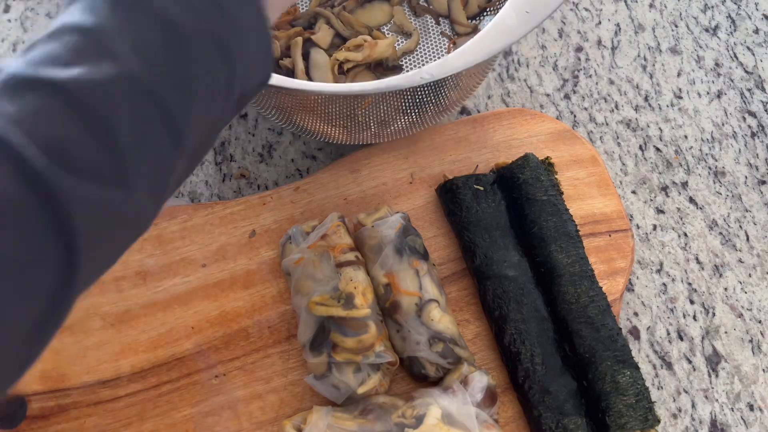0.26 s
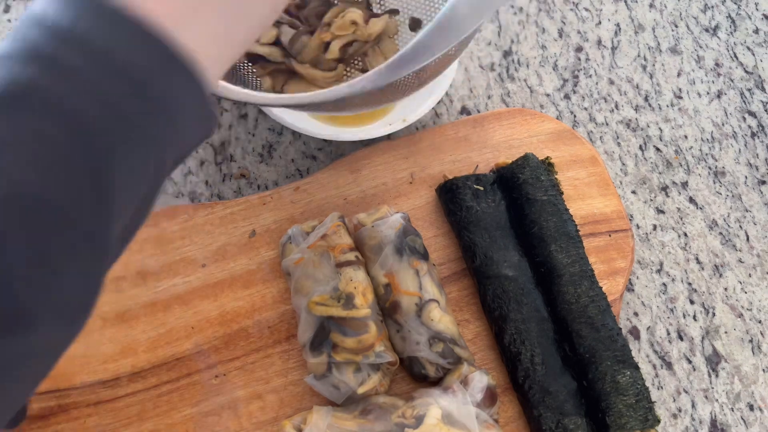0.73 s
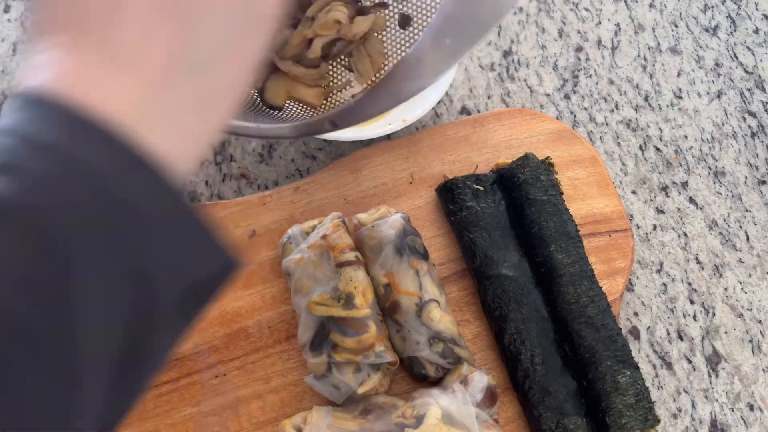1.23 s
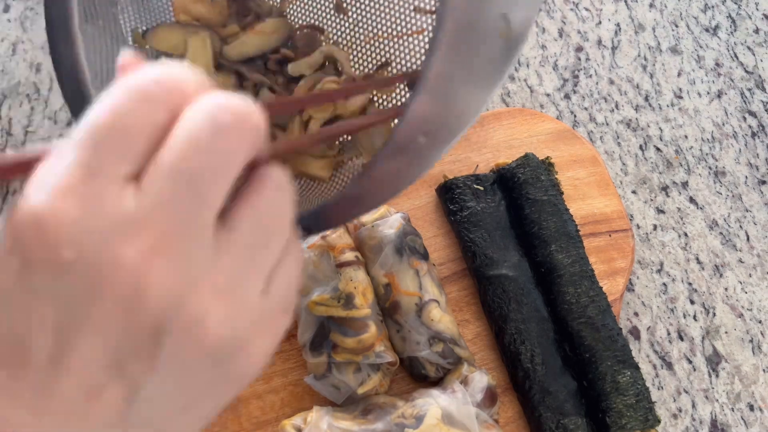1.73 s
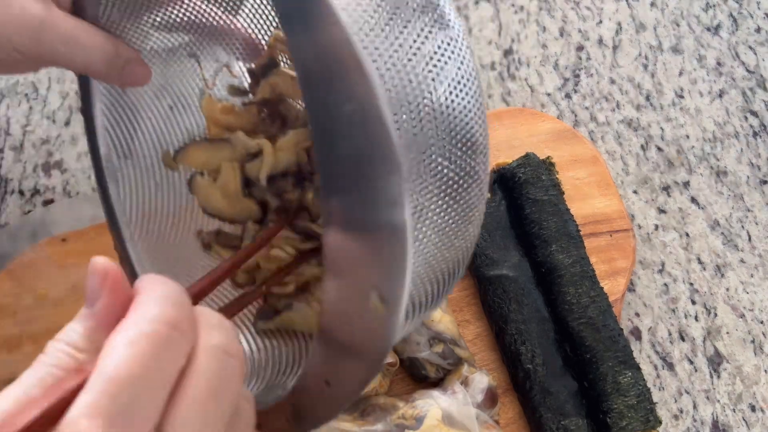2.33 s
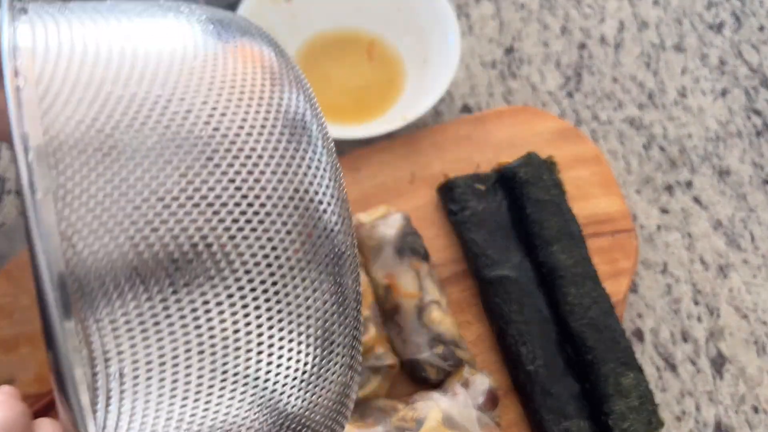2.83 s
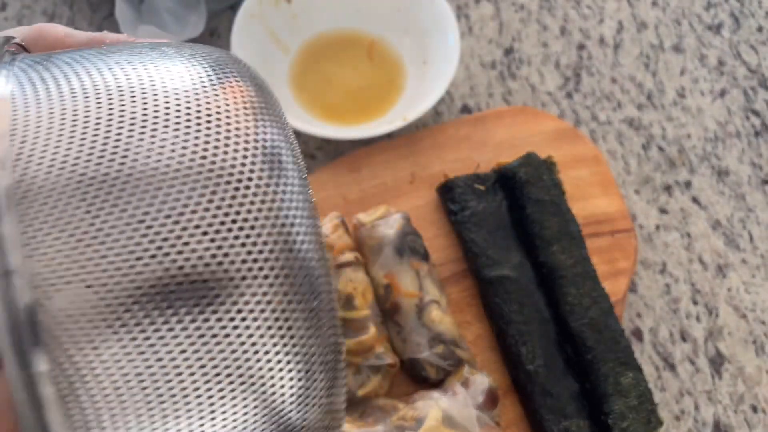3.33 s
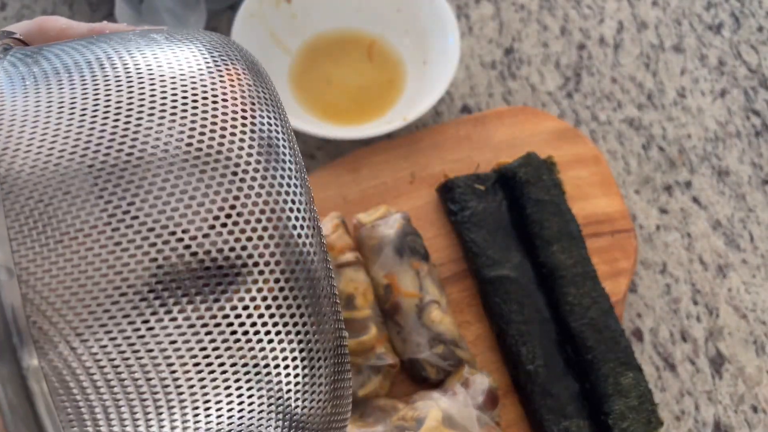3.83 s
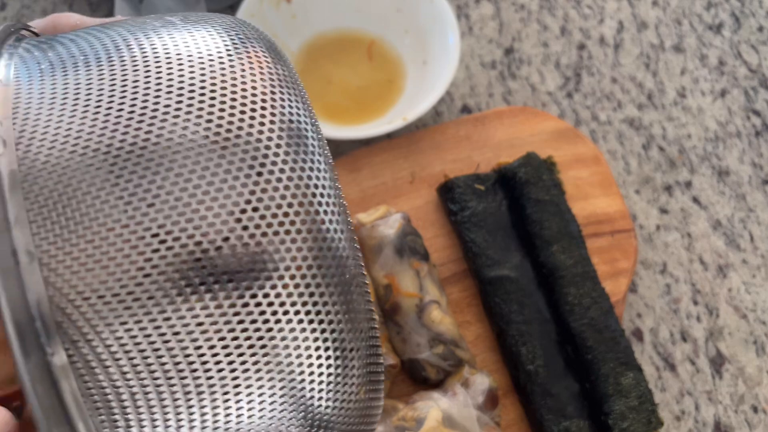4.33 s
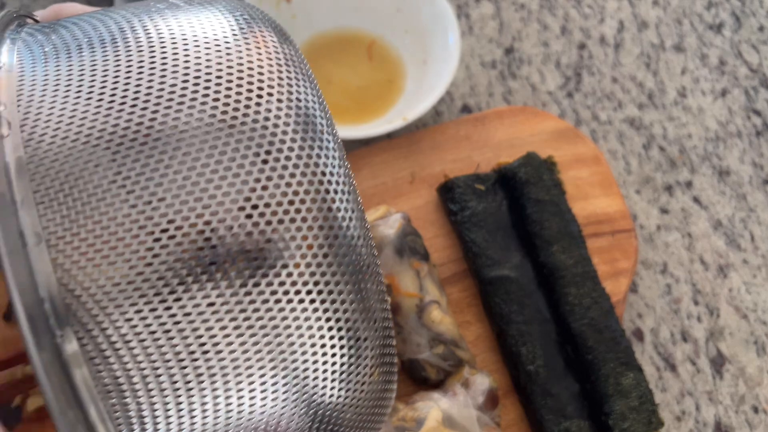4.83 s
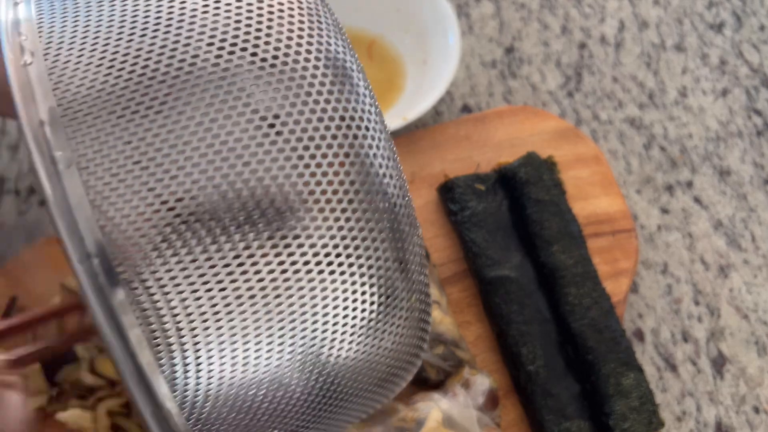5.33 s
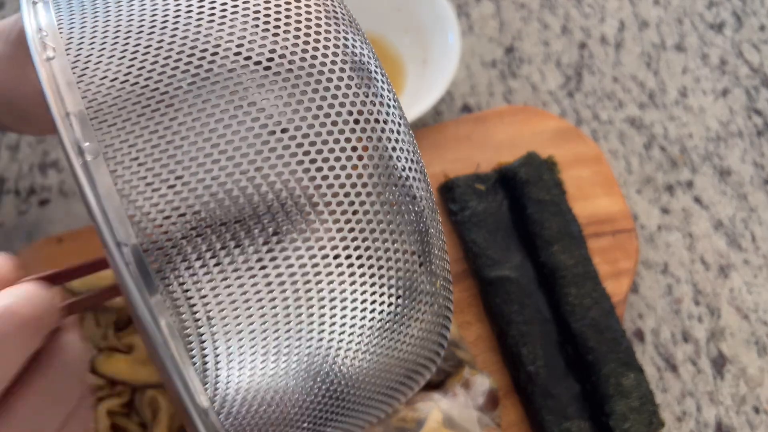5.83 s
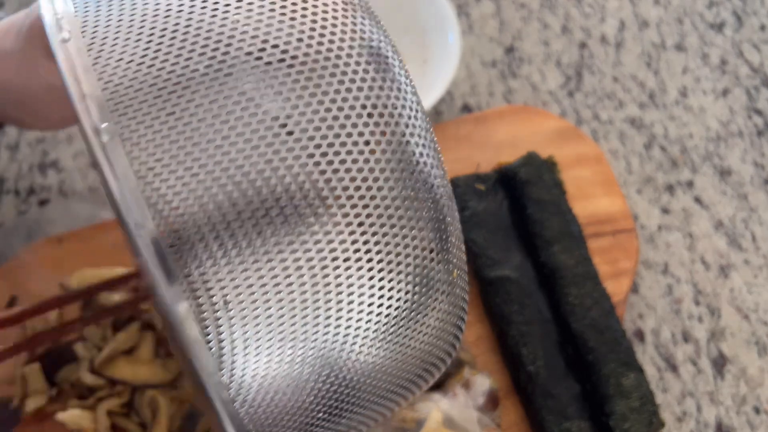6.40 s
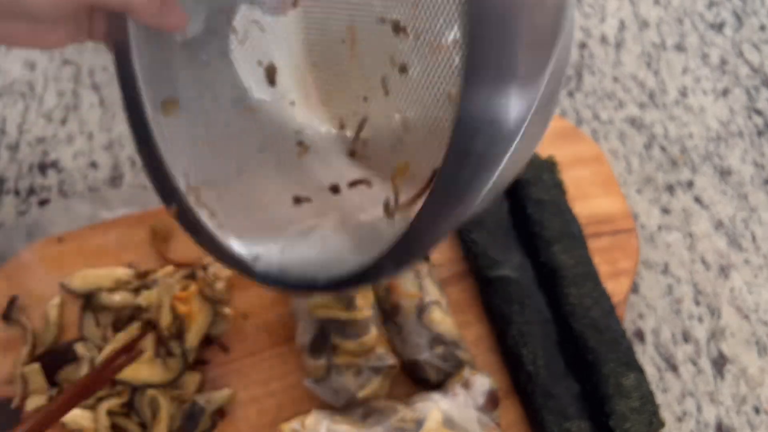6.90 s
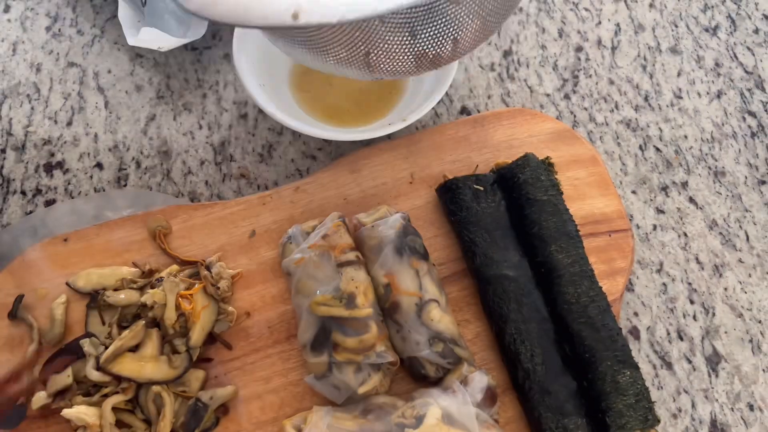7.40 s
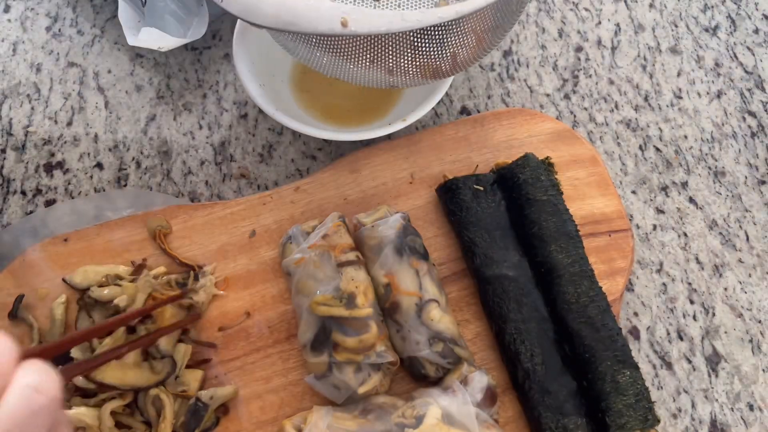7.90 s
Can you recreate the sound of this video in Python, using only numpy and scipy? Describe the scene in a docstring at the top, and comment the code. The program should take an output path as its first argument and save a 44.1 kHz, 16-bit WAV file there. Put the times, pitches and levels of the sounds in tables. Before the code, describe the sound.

Close in a small home kitchen, wooden chopsticks rake wet mushrooms from a holed steel colander. Quick bright clicks and tiny zipping scrapes come in bursts, strongest in the first two seconds, with soft thumps and brief squeaks. After a lull, sparser, lighter ticks ring on the tipped steel. Near the end the colander clatters onto a china bowl in rapidly fading bounces. A faint appliance hum sits underneath.

```python
"""Chopsticks raking mushrooms from a colander

Wooden chopsticks rake mushrooms from a holed steel colander, first level, then tipped over a cutting board.
Their tips skip from hole to hole and click: short random touches set the ringing notes of the steel going.
Wet food rustles in fine grains, squeaks are wavering tones, and soft thumps are low tones that die away.
At the end the colander rattles to rest on a china bowl, in a small kitchen with a humming appliance."""
import sys
import numpy as np
from scipy import signal
from scipy.fft import rfft, irfft, next_fast_len
from scipy.io import wavfile

SR = 44100
rng = np.random.default_rng(int(sys.argv[2]) if len(sys.argv) > 2 else 0)


def int16_out(signal):
    """Quantize to a 16-bit WAV file."""
    q = np.round(np.clip(np.atleast_2d(signal).T, -1, 1) * 32767)
    wavfile.write(sys.argv[1], SR, q.astype(np.int16))


N = 359415
TIME = np.arange(N) / SR


def from_db(db):
    """Turn decibels into a plain multiplier."""
    return 10 ** (np.asarray(db) / 20)


def rms_one(x):
    """Scale a sound to an average (rms) strength of 1."""
    return x / np.sqrt(np.mean(x ** 2) + 1e-20)


def at_hz(points, hz):
    """Read between the points of a table, with pitch on a logarithmic scale."""
    points = np.array(points)
    return np.interp(np.log(hz + 1), np.log(points[:, 0]), points[:, 1])


def add(track, s, sound):
    """Mix a sound into a track, starting at s seconds."""
    part = track[max(int(s * SR), 0):][:len(sound)]
    part += sound[:len(part)]


def wander(t, per_s):
    """A random value that glides to a new place so many times a second."""
    return np.interp(t * per_s, np.arange(SR), rng.standard_normal(SR))


def coloured(x, colour, size=4096):
    """Shape the spectrum with a filter that never sounds early (minimum phase), at unit power gain."""
    log_gain = np.log(from_db(at_hz(colour, np.fft.rfftfreq(size, 1 / SR))))
    cepstrum = irfft(log_gain)
    # folding the cepstrum onto its first half makes the filter start at once
    fold = 1 + np.sign(size / 2 - np.arange(size))
    fold[0] = 1
    pulse = irfft(np.exp(rfft(cepstrum * fold)))
    return signal.oaconvolve(x, pulse / np.linalg.norm(pulse))[:N]


def resonance(x, hz, width_hz):
    """One ringing pitch, with gain 1 at its peak; the narrower it is, the longer it rings."""
    r = np.exp(-np.pi * width_hz / SR)
    feed = np.array([1, 0, -1]) * (1 - r * r) / 2
    feedback = [1, -2 * r * np.cos(2 * np.pi * hz / SR), r * r]
    return signal.lfilter(feed, feedback, x + 1e-18)


def ringing(x, modes):
    """A contact plus the object's own notes (modes) that it sets ringing."""
    out = x
    for hz, db, t60 in modes:
        width_hz = np.log(1000) / (np.pi * t60)
        out = out + from_db(db) * resonance(x, hz, width_hz)
    return out


def brighten(x, treble_db, corner_hz=5000):
    """A harder contact has more treble: raise or lower what lies above the corner."""
    low = signal.sosfiltfilt(signal.butter(2, corner_hz, fs=SR, output="sos"), x)
    return low + from_db(treble_db) * (x - low)


def contact(snap_s, shiver_db, shiver_s, size=2048, count=40):
    """One touch of unit energy: pitches arrive at their own delays, with a shiver of dying noise."""
    bands = np.linspace(0, count - 1, size // 2 + 1)
    delay_s = np.interp(bands, np.arange(count), snap_s * rng.exponential(1, count))
    phase = -2 * np.pi * np.cumsum(delay_s) * SR / size
    snap = irfft(np.exp(1j * phase)) * np.sqrt(np.linspace(1, 0, size))
    shiver = rng.standard_normal(size) * np.exp(-TIME[:size] / shiver_s)
    touch = snap + from_db(shiver_db) * shiver / np.linalg.norm(shiver)
    return touch / np.linalg.norm(touch)


def glint(touch, glint_db=5, low_hz=1400, high_hz=9000, width_hz=330):
    """Every hole adds a brief ring at its own random pitch; unit energy."""
    hz = low_hz * (high_hz / low_hz) ** rng.random()
    touch = touch + from_db(glint_db) * resonance(touch, hz, width_hz)
    return touch / np.linalg.norm(touch)


def at_spot(touch, hz, db, width_hz):
    """The touched spot of the wall rings briefly at its own pitch."""
    return touch + from_db(db) * resonance(touch, hz, width_hz)


def clicks(rows, snap_s, shiver_db, shiver_s, graze_db=-21, graze_s=0.005, spot_width_hz=880):
    """Single touches, each after a faint graze; rows that name a spot on the steel ring there."""
    out = np.zeros(N)
    for s, db, treble_db, *spot in rows:
        touch = brighten(contact(snap_s, shiver_db, shiver_s), treble_db)
        if spot:
            touch = at_spot(touch, *spot, spot_width_hz)
        graze = contact(snap_s, shiver_db, shiver_s)
        add(out, s - graze_s, from_db(db + graze_db) * graze)
        add(out, s, from_db(db) * touch)
    return out


# colour of the room's air noise before its sides are shaped: (pitch [Hz], relative level [dB])
AIR = [(15, -36), (25, -23.5), (75, -6.5), (119, -10), (150, -3), (273, -11), (303, -17), (364, -13),
       (404, -24.5), (437, -16), (953, -28.5), (1300, -42.5), (1900, -39.5), (3000, -45), (12000, -47),
       (16200, -84), (22000, -120)]
AIR_DB = -61.5
# the appliance's hum: (pitch [Hz], width of the first of two filters [Hz], level [dB])
DRONE = [(147.74, 5.9, -65.5), (1457, 68, -85.5)]


def room_tone(bass_side_db=-19, treble_side_db=-6):
    """Soft air noise, nearly alike on both sides in the bass, and an appliance's wavering drone."""
    hz = np.fft.rfftfreq(N, 1 / SR)
    mid, side = rfft(rng.standard_normal((2, N))) * from_db(at_hz(AIR, hz))
    side = side * from_db(at_hz([(120, bass_side_db), (700, 3.4), (8000, treble_side_db)], hz))
    air = rms_one(irfft(mid + side * [[1], [-1]], N))
    drone = np.zeros(N)
    for f, width, db in DRONE:
        # noise through two narrow filters becomes a hum that wavers
        hum = resonance(resonance(rng.standard_normal(N), f, width), f, 2 * width)
        drone += from_db(db) * rms_one(hum)
    return from_db(AIR_DB) * air + drone


# wet mushrooms sliding and parting: (time [s], length [s], level at the top of the swell [dB])
SLIDES = [(-0.06, 0.15, -72), (0.261, 0.17, -72.5), (1.88, 0.14, -68.5), (2.195, 0.36, -76.5),
          (2.802, 0.24, -83), (3.721, 0.26, -70.5)]


def wet_food(grains_per_s=3000, grain_db=3, clumps_per_s=70, clump_db=3.0,
             low_hz=1700, high_hz=8500, width_hz=500, size=12):
    """Moist mushrooms slide over steel: fine grains of many pitches gather in uneven clumps."""
    swell = np.zeros(N)
    for s, length, db in SLIDES:
        swell += from_db(db) * np.sin(np.pi * np.clip((TIME - s) / length, 0, 1))
    happens = rng.random(N) < grains_per_s / SR
    strength = from_db(grain_db * np.minimum(rng.exponential(1, N), 4))
    grains = rng.standard_normal(N) * happens * strength
    dealt = rng.integers(0, size, N)  # which pitch each grain gets
    rustle = np.zeros(N)
    for k, hz in enumerate(np.linspace(low_hz, high_hz, size)):
        clumps = from_db(clump_db * wander(TIME, clumps_per_s))
        rustle += resonance(grains * clumps * (dealt == k), hz, width_hz) / np.sqrt(hz)
    return swell * rms_one(rustle)


# holes crossed per second in a usual stroke; a stroke louder by DOUBLING_DB is twice as fast
SKIPS_PER_S, USUAL_DB, DOUBLING_DB = 175, -40, 45
RELEASE_DB_PER_S = 1099  # the scrape dies as the tip lifts


def strokes(rows, snap_s, shiver_db, shiver_s, jitter, uneven_db, spot_width_hz, count=26, size=9000):
    """The tip catches in hole after hole, then lifts: uneven touches on a spot whose pitch glides."""
    out = np.zeros(N)
    for s, length, _, final_db, swell_db, treble_db, spot_hz, spot_db, glide in rows:
        per_s = SKIPS_PER_S * 2 ** ((final_db - USUAL_DB) / DOUBLING_DB)
        train = np.zeros(size)
        strength = np.sqrt(SR / per_s)  # slower touches are each stronger
        for k in range(count):
            touch = glint(contact(snap_s, shiver_db, shiver_s))
            slip, force = rng.uniform(-1, 1, 2)
            t = (k + jitter * slip * (k > 0)) / per_s
            drawn = min(t / length, 1)  # share of the stroke done
            lift_db = RELEASE_DB_PER_S * max(t - length, 0)
            db = final_db - swell_db * (1 - drawn) - lift_db
            touch = at_spot(touch, spot_hz * 2 ** (glide * drawn), spot_db, spot_width_hz)
            add(train, t, from_db(db + uneven_db * force) * strength * touch)
        add(out, s, brighten(train, treble_db))
    return out


TIPPED_S = 2.7  # the colander is level before this time [s] and tipped after it


def level_and_tipped(rows):
    """Split events into those before and those after the colander is tipped."""
    level = [row for row in rows if row[0] < TIPPED_S]
    tipped = [row for row in rows if row[0] >= TIPPED_S]
    return level, tipped


# a chopstick lands and is drawn over the holes, levels before the mix:
# (time [s], length [s], landing level [dB], final scrape level [dB], rise in level over the stroke [dB],
#  treble [dB], pitch of the spot [Hz], ring of the spot [dB], glide of the spot [octaves])
STROKES = [(0.421, 0.019, -51, -61.5, -2, -1.5, 1900, 11, -0.38),
           (0.455, 0.053, -35, -39.5, 10, 2, 7100, -13, 0.48),
           (0.511, 0.044, -47, -42.5, 0, -6.5, 4380, -1, 0),
           (0.8063, 0.0018, -32, -46, 3, 5, 2260, 2, 0.058),
           (0.814, 0.055, -36, -41, -4.5, -3, 2200, -8, -0.014),
           (0.855, 0.027, -41, -40, 4.5, 2, 920, 3, 0.36),
           (0.924, 0.011, -19.5, -37.5, 7, 2.5, 3120, 12, -0.33),
           (1.126, 0.023, -20, -51.5, -4, -11.5, 1700, -8, -0.12),
           (1.161, 0.064, -45, -35.5, 12, 1.5, 980, 2, -0.45),
           (1.463, 0.0044, -22.5, -44, 2.5, -2.5, 2870, 9, -0.41),
           (1.487, 0.029, -30.5, -29.5, 1.5, -1, 2710, 3.5, 0.024),
           (1.721, 0.01, -13.5, -35.5, 6, 2.5, 4100, -8, 0.18),
           (1.748, 0.018, -23, -28.5, 6, -2, 2470, -6, 0.27),
           (2.115, 0.0152, -33.5, -43.5, 10.5, -16.5, 2290, 2.5, 0.3),
           (3.277, 0.023, -37, -47.5, 0, 3, 1820, 13, 0.42),
           (3.741, 0.015, -44, -57.5, 3, 3, 1610, 10, 0.083),
           (4.305, 0.05, -31, -56, 7, 1, 2950, 6.5, 0.016),
           (4.664, 0.012, -23.5, -48.5, 5.5, 2.5, 1750, -4.5, -0.043),
           (4.718, 0.012, -29.5, -41, 0.5, 0.5, 3920, 7.5, -0.097),
           (4.758, 0.053, -33, -55, -11, -7, 2410, 2.5, 0.077),
           (5.088, 0.062, -47, -52.5, 5.5, 5, 4350, -12.5, -0.042),
           (5.158, 0.032, -38, -42, 3, -6, 3130, 8, -0.048),
           (5.529, 0.063, -24.5, -54, -3.5, 2.5, 4600, -9.5, 0.091),
           (5.575, 0.08, -46, -52.5, -2.5, -2, 2800, 4, -0.24),
           (5.888, 0.038, -25, -63.5, -2.5, 6.5, 2590, 10, 0),
           (5.923, 0.041, -49.5, -41, 10.5, 1, 2270, 12, 0.25),
           (5.966, 0.016, -25.5, -35.5, 9, 10.5, 3000, 10, -0.13),
           (6.247, 0.045, -30, -39, 17.5, -10, 2720, 5.5, 0.11),
           (6.52, 0.001, -22.5, -35.5, 0, -1, 2750, 14.5, -0.037)]
# the tip snaps free or clicks on the steel, levels before the mix:
# (time [s], level [dB], treble [dB], pitch of the spot [Hz], ring of the spot [dB])
TAPS = [(0.475, -37, -2, 6400, 4), (.484, -37, 19, 7700, -3), (0.4895, -20, 10.5, 8950, 7.5),
        (0.5096, -25, 13.5, 4400, -3), (0.543, -28.5, 10.5, 1700, -2), (.554, -22.5, -9, 2820, 1),
        (0.801, -35, -3, 2400, 3), (0.845, -26.5, 2, 2300, 10), (.878, -31, 6, 3420, 4),
        (0.8922, -18.5, 10, 6110, -1), (.904, -28, 1, 3050, 13), (.934, -23.5, 9, 3700, 11.5),
        (.945, -36, 12.5, 3300, 23), (1.178, -18.5, -5, 3480, 7.5), (1.196, -21, 6, 6240, 0),
        (1.212, -28.5, 12, 6200, 4), (1.229, -22.5, 9, 5870, 4.5), (1.477, -24, 4, 4330, 11),
        (1.494, -25, 13, 9000, 10), (1.503, -18, 12, 8600, -1), (1.5099, -10.5, 12.5, 7300, -13),
        (1.728, -18, -1, 3000, 7), (1.7541, -17.5, 10, 6940, -1), (1.769, -11, -5, 2860, 5.5),
        (3.296, -29.5, -4.5, 1500, 15), (4.158, -25, 1, 1640, -5), (4.178, -26.5, 5.5, 5630, 5.5),
        (4.2099, -25.5, 4, 4060, 0.5), (4.331, -34.5, -2.5, 2800, 13), (4.352, -42, -10, 1800, 7),
        (4.678, -28, -4.5, 1740, -6), (4.7116, -30.5, 16.5, 7600, -0.5), (4.722, -29, 10, 1870, 1),
        (5.064, -38.5, -2, 5700, -7), (5.103, -32.5, -4, 3000, 2.5), (5.114, -23.5, -14.5, 4500, -21.5),
        (5.165, -24, -2.5, 3020, 4.5), (5.178, -23, -8, 4370, 4.5), (5.45, -29.5, -9.5, 1290, 11.5),
        (5.475, -24, -5, 4780, -3.5), (5.608, -27.5, 1.5, 2700, 8), (5.646, -36, -4.5, 2380, 13),
        (5.982, -33, 3, 3950, -7), (5.998, -27, 16.5, 11000, 2), (6.277, -29.5, 2, 3760, -4),
        (6.292, -20.5, -13.5, 4300, -13), (6.3, -24, 10, 1400, -23), (6.5242, -21, 10.5, 4500, 4),
        (6.565, -34, 14.5, 7700, 3), (6.569, -28.5, 14, 7750, -11.5)]
# broad colour of raking in the level colander: (pitch [Hz], relative level [dB])
RAKE_COLOUR = [(130, -9.5), (270, -6), (400, -4.5), (560, -1), (780, -3.5), (1200, -4), (1700, -5),
               (2700, -4.5), (4300, 1), (5000, -4), (7200, -0.5), (10000, -6.5), (12000, 1.5), (16000, -19)]
# broad colour of contacts on the bare wall: (pitch [Hz], relative level [dB])
WALL_COLOUR = [(300, -12.5), (1050, -9.5), (1400, -4), (1720, -1), (2000, -5), (2750, 0), (3400, -6.5),
               (4400, 7), (5050, -6), (5700, 3), (6500, -1.5), (7500, -4), (11000, -3.5), (16000, -9.5)]
# ringing notes of the steel colander: (pitch [Hz], level over the contact [dB], time to fall 60 dB [s])
COLANDER = [(266, 4.5, 0.34), (337.2, 10, 0.27), (820, 1, 0.035), (1400, 2.5, 0.13), (1700, -1, 0.026),
            (2073, 0.5, 0.25), (2290, -4, 0.056), (2474, 0.5, 0.14), (2810, -2, 0.18), (2977, -4.5, 0.14),
            (2945, -4, 0.1185), (3822, -0.5, 0.11), (3970, -4.5, 0.16), (4360, -3, 0.11),
            (4520, -3.5, 0.13), (7164, -2, 0.14), (7630, -2.5, 0.086), (8030, -4.5, 0.052)]


def chopsticks():
    """Wood lands, scrapes and clicks on steel; each contact sets the whole colander ringing."""
    landings = [(s, db, treble_db, hz, spot_db) for s, _, db, _, _, treble_db, hz, spot_db, _ in STROKES]
    level_strokes, tipped_strokes = level_and_tipped(STROKES)
    level_taps, tipped_taps = level_and_tipped(landings + TAPS)
    raking = strokes(level_strokes, snap_s=0.0012, shiver_db=4.0, shiver_s=0.005,
                     jitter=0.31, uneven_db=6.0, spot_width_hz=250)
    scraping = strokes(tipped_strokes, snap_s=0.001092, shiver_db=-0.5, shiver_s=0.0092,
                       jitter=0.27, uneven_db=-3.5, spot_width_hz=450)
    rake_taps = clicks(level_taps, snap_s=0.0012, shiver_db=3.0, shiver_s=0.0027)
    wall_taps = clicks(tipped_taps, snap_s=0.0014, shiver_db=-2.5, shiver_s=0.0048)
    rake = from_db(-2.5) * raking + from_db(3.0) * rake_taps
    wall = from_db(-5.5) * scraping + from_db(3.5) * wall_taps
    return ringing(coloured(rake, RAKE_COLOUR) + coloured(wall, WALL_COLOUR), COLANDER)


# soft thumps of hand, board and bowl: (time [s], peak of the swell [dB], pitch [Hz])
THUMPS = [(0.542, -50.5, 328), (0.782, -41.5, 275), (1.214, -43, 460), (1.501, -37, 270),
          (1.754, -35.5, 286), (2.18, -48, 247.6), (3.027, -52, 276), (3.677, -38.5, 123.4),
          (3.701, -39.5, 94.6), (7.533, -48.5, 304), (7.598, -66, 194), (7.665, -56, 368),
          (8.03, -45, 93.2)]
# the counter booms under each bounce on the bowl: (pitch [Hz], level at the first bounce [dB])
COUNTER = [(121.4, -31.5), (88.5, -32.5)]
THUMP_RISE_S, BOOM_LAG_S, SETTLE_DB_PER_S = 0.0087, 0.0075, 99


def thumps(size=12000):
    """Soft pushes swell and die away; the counter's booms weaken as the colander settles."""
    booms = []
    for s, *_ in BOUNCES:
        for hz, db in COUNTER:
            settled_db = SETTLE_DB_PER_S * (s - BOUNCES[0][0])
            booms.append((s + BOOM_LAG_S, db - settled_db, hz))
    out, t = np.zeros(N), TIME[:size]
    swell = (t / THUMP_RISE_S) * np.exp(1 - t / THUMP_RISE_S)
    for s, db, hz in THUMPS + booms:
        add(out, s, from_db(db) * swell * np.sin(2 * np.pi * hz * t))
    return out


# brief squeaks of wet wood and fingers on the steel: (time [s], length [s], level [dB], pitch [Hz])
SQUEAKS = [(.803, 0.027, -49, 2253), (0.856, .038, -42.5, 3356), (0.915, 0.02, -42.5, 3020),
           (2.482, 0.1, -84, 2140), (3.551, 0.082, -83, 5070)]


def squeaks(waver_octaves=0.02, waver_per_s=400, rasp=0.84):
    """A sticking surface sings one rough, wavering tone that swells and fades."""
    out = np.zeros(N)
    for s, length, db, hz in SQUEAKS:
        t = TIME[:int(length * SR)]
        pitch_hz = hz * 2 ** (waver_octaves * wander(t, waver_per_s))
        tone = np.sin(2 * np.pi * np.cumsum(pitch_hz) / SR)
        roughness = 1 + rasp * wander(t, waver_per_s)
        add(out, s, from_db(db) * rms_one(tone * roughness * np.sin(np.pi * t / length)))
    return out


# dull knocks of the chopsticks on food and board: (time [s], level before the mix [dB], treble [dB])
KNOCKS = [(2.183, -36.5, 17.5), (2.367, -47, 19), (3.697, -30, -12), (8.024, -59, 31), (8.037, -40.5, -7)]
# broad colour of the knocks: (pitch [Hz], relative level [dB])
KNOCK_COLOUR = [(150, 22), (650, 14), (900, 8), (1400, 13), (2500, -4.5), (5000, -21.5), (16000, -24)]


def knocks():
    """Wood meets food and board: short touches, coloured dark."""
    touches = clicks(KNOCKS, snap_s=0.00095, shiver_db=1.5, shiver_s=0.0088)
    return coloured(from_db(14.5) * touches, KNOCK_COLOUR)


# the colander bounces on the bowl, levels before the mix:
# (time [s], clatter level [dB], clatter treble [dB], ring of the china [dB], ring of the rim [dB])
BOUNCES = [(7.53, -35, 4, -10, 1), (7.593, -34.5, -7, -10.5, -4), (7.661, -33, -3, -18.5, -3),
           (7.7, -37, -1.5, -12.5, -8), (7.743, -40, -8, -26.5, -5.5), (7.765, -46.5, -12, -25, -13),
           (7.787, -50, -6, -27, -1.5)]
# broad colour of the clatter and the china: (pitch [Hz], relative level [dB])
BOUNCE_COLOUR = [(150, 6.5), (330, 2.5), (620, -3), (800, -5.5), (1050, 2.5), (1450, 3.5), (2300, -7),
                 (3100, -6), (4300, -3), (5200, -8), (6700, -4), (8500, -9), (11000, -0.5), (16000, -8.5)]
# notes of the bowl with the colander on it: (pitch [Hz], level over the blow [dB], time to fall 60 dB [s])
BOWL = [(656, 18, 0.22), (915, 5.5, 0.1), (1394, 9, 0.37), (1614, 11, 0.3), (2094, 10, 0.22),
        (3026, 23.5, 0.23), (3700, 8, 0.23)]
# the steel rim's close, beating pair and a higher note:
# (pitch [Hz], level over the blow [dB], time to fall 60 dB [s])
RIM = [(6900, -5.5, 0.25), (6740, -10, 0.28), (8900, -19, .22)]


def bowl(clatter_db=22.0, uneven_db=3.0):
    """Each bounce clatters, and a clean blow rings the steel rim and, unevenly, the notes of the china."""
    touches = clicks([row[:3] for row in BOUNCES], snap_s=0.003, shiver_db=-1, shiver_s=0.014)
    china_blows, rim_blows = np.zeros((len(BOWL), N)), np.zeros(N)
    for s, _, _, china_db, rim_db in BOUNCES:
        uneven = uneven_db * rng.uniform(-0.9, 1, len(BOWL))
        china_blows[:, int(s * SR)] = from_db(china_db + uneven)
        add(rim_blows, s, from_db([rim_db]))
    # keep only the rings, not the bare blows
    china = sum(ringing(blows, [mode]) - blows for blows, mode in zip(china_blows, BOWL))
    rim = ringing(rim_blows, RIM) - rim_blows
    return coloured(from_db(clatter_db) * touches + china, BOUNCE_COLOUR) + rim


def kitchen(x, room_db=-10, t60=0.35, early_db=-10, early_t60=0.041,
            side_db=-3, side_hz=9000, wall_hz=10000, size=22050):
    """Quick reflections off the counter, then the room's tail, both with little top treble."""
    t, out = TIME[:size], np.array([x, x])
    side_filter = signal.butter(3, side_hz, fs=SR, output="sos")
    wall_filter = signal.butter(2, wall_hz, fs=SR)
    for db, decay_s in ((early_db, early_t60), (room_db, t60)):
        fade = from_db(-60 * t / decay_s) * (t > 0.002)
        mid, side = rng.standard_normal((2, size)) * fade
        side = signal.sosfilt(side_filter, side)
        echo = signal.lfilter(*wall_filter, mid + from_db(side_db) * side * [[1], [-1]])
        echo = echo * np.sqrt(2) / np.linalg.norm(echo)
        out = out + from_db(db) * signal.oaconvolve(x[None], echo, axes=1)[:, :N]
    return out


def scene():
    """Chopsticks, food, knocks and bowl echo in the kitchen; thumps and room tone join without echo."""
    echoing = wet_food() + chopsticks() + squeaks() + knocks() + bowl()
    return room_tone() + kitchen(echoing) + thumps()


# the pair of close microphones: (pitch [Hz], phase by which left leads [radians])
PORT_PHASE = [(4000, 0), (4900, -1.2), (5300, .3), (7300, -.1), (10000, -1.5), (12000, -2.6), (13500, -3.2),
              (16000, -3.7)]


def record(dry):
    """Two close microphones differ in phase in the treble; the very top is cut."""
    size = next_fast_len(N + 4096)
    phase = at_hz(PORT_PHASE, np.fft.rfftfreq(size, 1 / SR))
    turn = np.exp(0.5j * phase * [[1], [-1]])  # half the lead on each side
    pair = irfft(rfft(dry, size) * turn, size)[:, :N]
    top_cut = signal.cheby2(14, 70, 17300, fs=SR, output="sos")  # 70 dB down from 17300 Hz up
    return signal.sosfilt(top_cut, pair)


dry = scene()
out = record(dry)
int16_out(out)
```